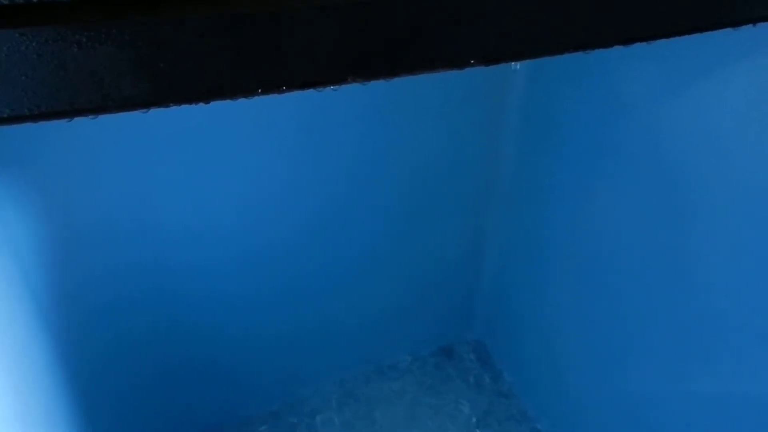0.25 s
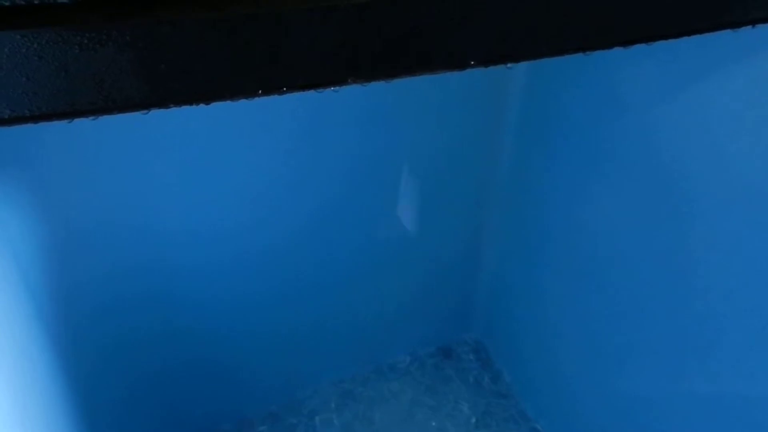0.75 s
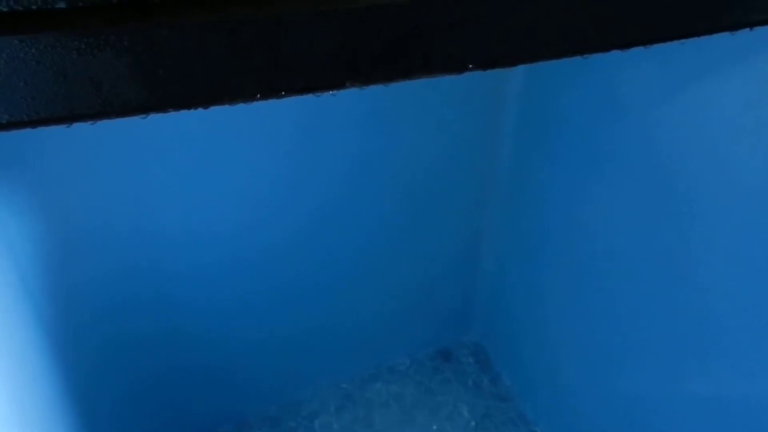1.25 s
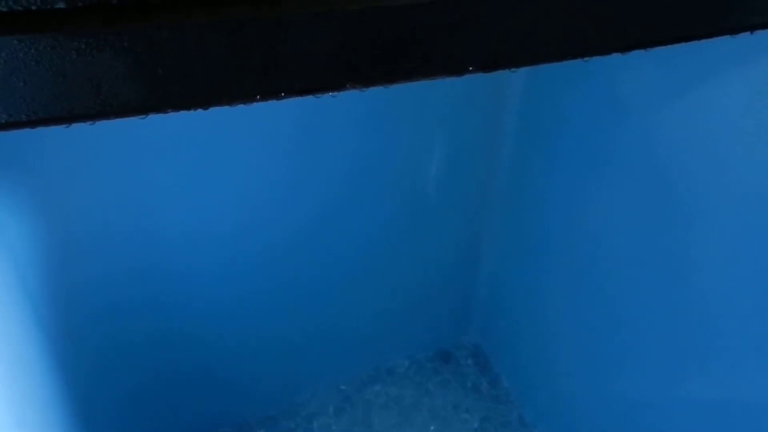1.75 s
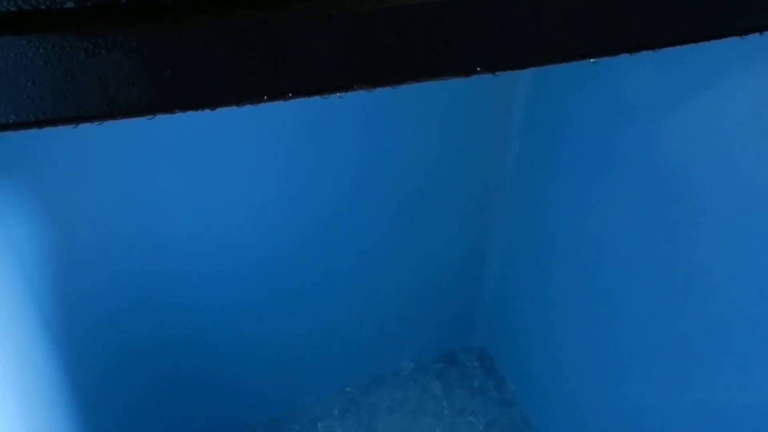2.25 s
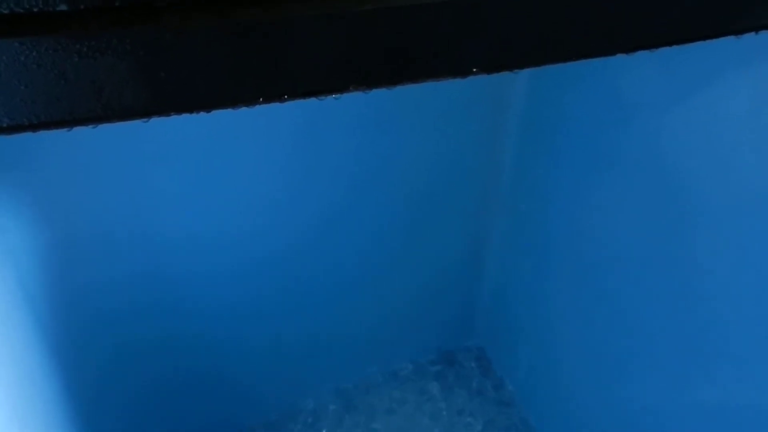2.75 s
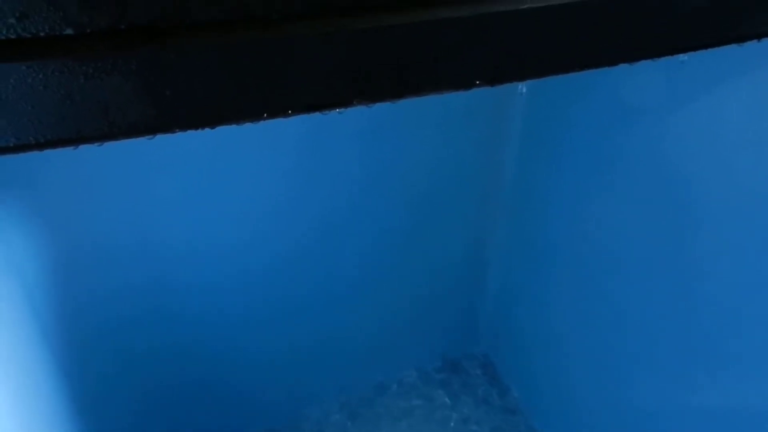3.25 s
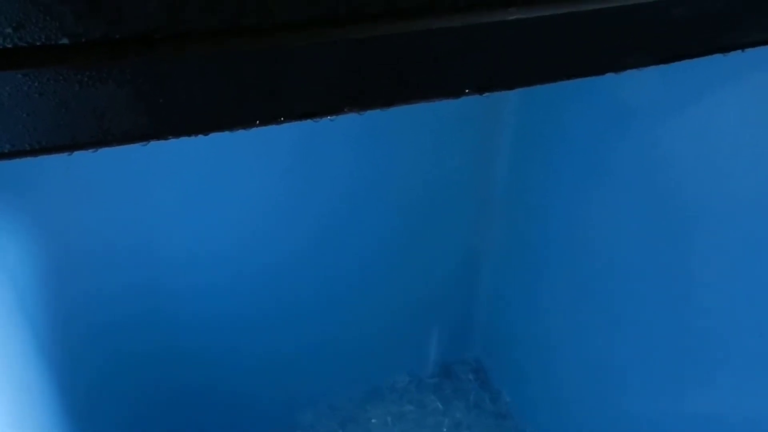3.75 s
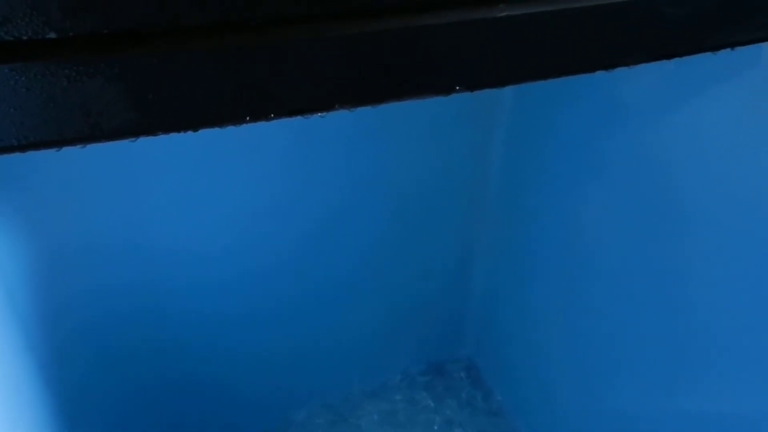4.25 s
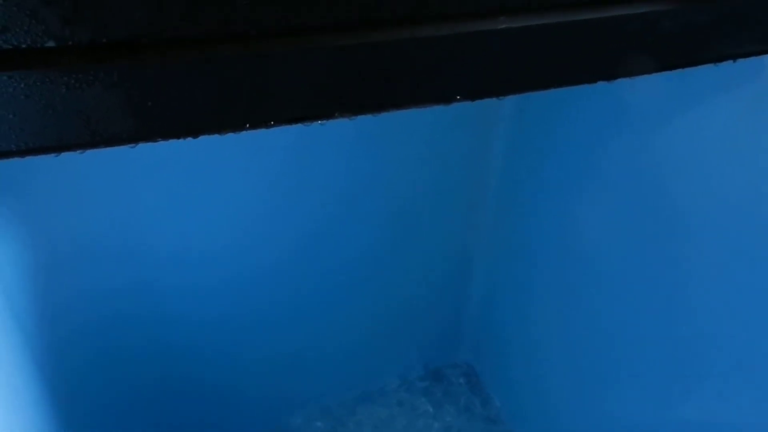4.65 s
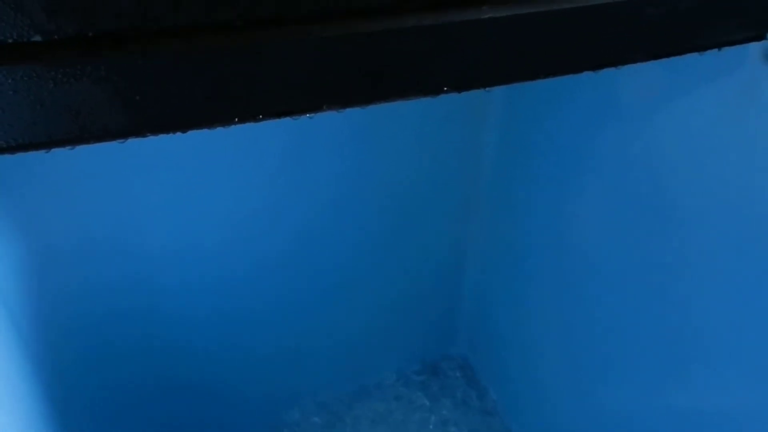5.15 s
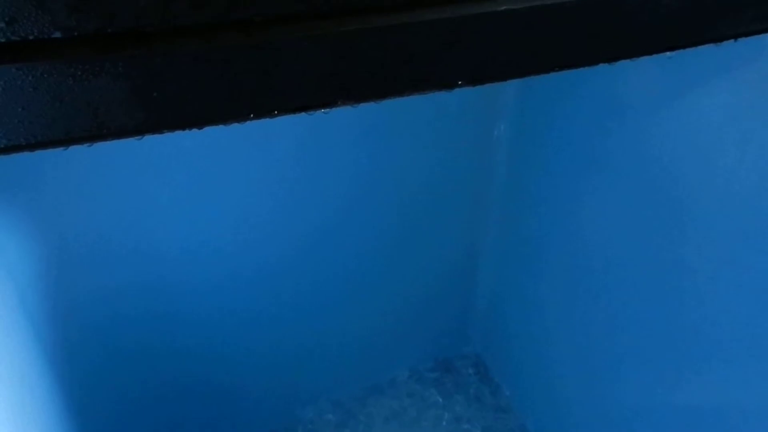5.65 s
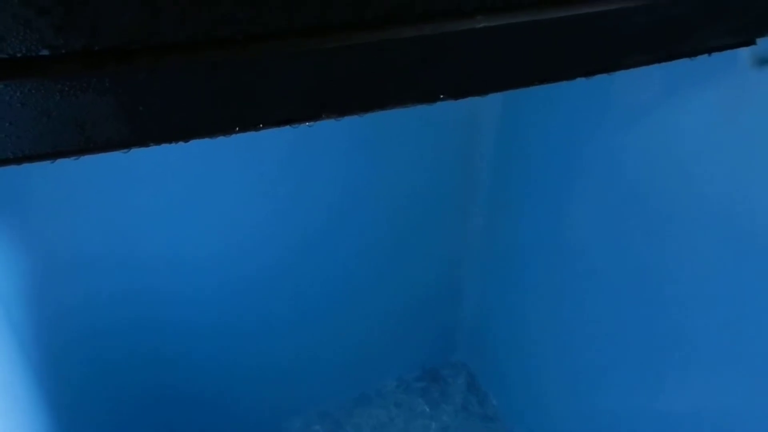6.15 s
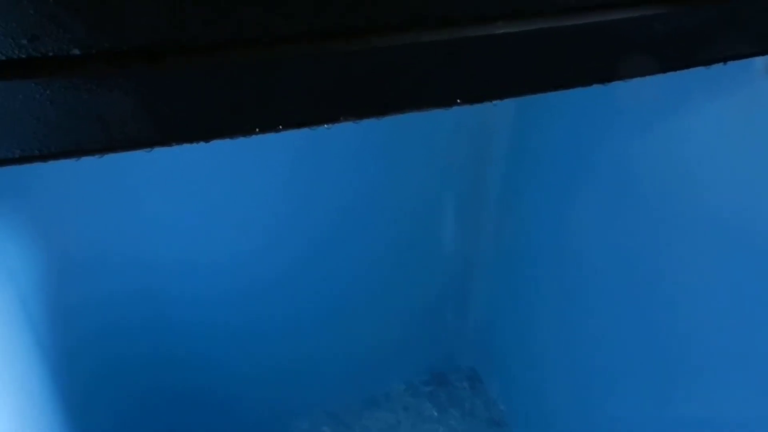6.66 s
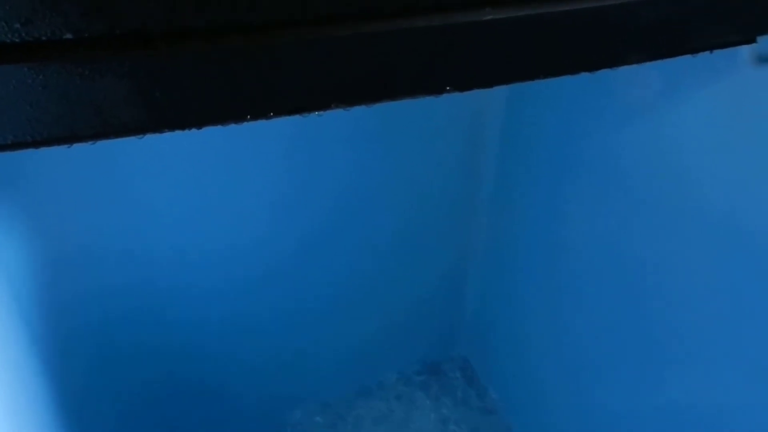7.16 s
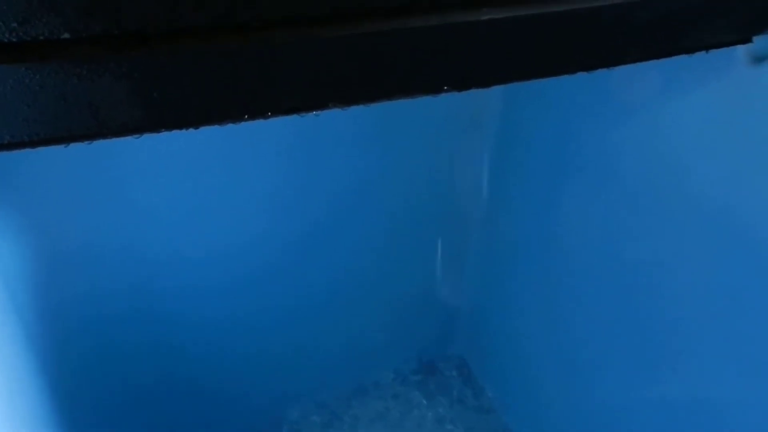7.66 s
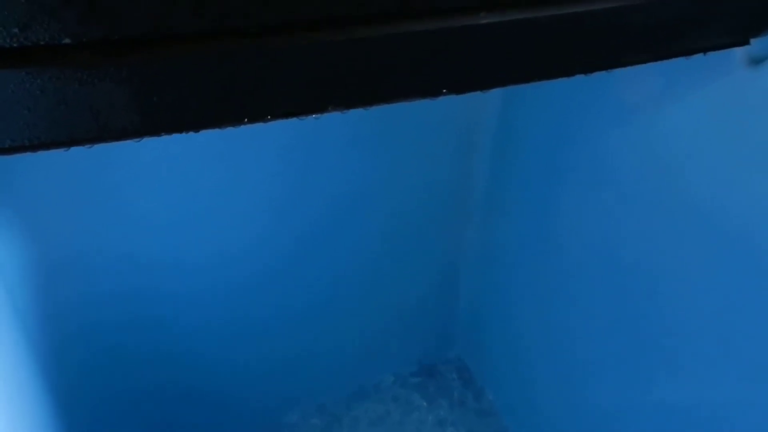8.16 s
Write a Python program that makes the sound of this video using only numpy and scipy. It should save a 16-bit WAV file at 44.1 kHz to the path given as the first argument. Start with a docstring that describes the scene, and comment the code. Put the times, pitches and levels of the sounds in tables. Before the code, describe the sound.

Steady deep compressor and gear drone with a faint whine, and lumpy scraping of ice behind a cabinet. In front, bright, dry, brittle knocks of ice, some hollow, some hissy, scatter slightly left and right with a brief plastic-bin ring and faint hall echo. Loud clacks momentarily push the hum down and it creeps back, most strongly in a lull after the middle.

```python
"""Ice machine, close at the bin

A commercial ice machine stands in a hall, with a stereo microphone close to its plastic ice bin.
Behind, motor tones hum and shaped noise grinds; now and then the scraper bites harder and rasps.
In front, each sound of the ice is a burst of noise with its own note and a brief bin echo; crumbs tick between.
The recorder's gain control ducks at loud clacks and creeps back, so the hum keeps swelling up again."""
import sys
import numpy as np
from scipy import signal
from scipy.fft import rfft, irfft
from scipy.io import wavfile
from scipy.ndimage import uniform_filter1d

SR = 44100
rng = np.random.default_rng(int(sys.argv[2]) if len(sys.argv) > 2 else 0)


def generate_wav(sig):
    """Save sig (samples, or channels by samples) to the path in sys.argv[1] as 16-bit PCM at SR."""
    pcm = np.round(np.clip(np.atleast_2d(sig).T, -1, 1) * 32767).astype(np.int16)
    wavfile.write(sys.argv[1], SR, pcm)


N = 371322
T = np.arange(N) / SR  # s

# Steady tones of compressor, fan and gear motor, before the slow level curve acts: f/Hz, level/dB rms
MOTOR_TONES = [(26.0, -49), (34.9, -41), (56.2, -38), (58.9, -24), (81.7, -26.5), (117.8, -16.5),
               (137.3, -34), (176.6, -29.5), (274.6, -33), (294.4, -27), (330.3, -37.5), (353.3, -28),
               (392.3, -31), (960.0, -35.5), (1000.9, -38.5), (1295.2, -48), (1354.1, -38)]
# Grinding heard through the cabinet, relative spectrum: f/Hz, level/dB per Hz
GRIND_COLOUR = [(20, -18), (45, -7.5), (90, -5.5), (160, 1), (260, 0), (400, -1), (480, -6), (950, -9.5),
                (1400, -13), (1850, -21.5), (2700, -25.5), (6000, -30), (12000, -34.5), (16000, -43)]
# Cabinet resonances that colour the grinding: f/Hz, width/Hz, peak/dB
CABINET_RESONANCES = [(404, 62, 3.5), (523, 45, 4.5), (186, 42, 1.5), (328, 14, 1.5), (777, 71, 4),
                      (1260, 43, -2), (1304, 29, 6.5), (1780, 270, 5.5), (7200, 610, 4), (11100, 710, 10.5)]
# Slow rise and fall of hum and grinding: t/s, level/dB
MACHINE_LEVEL = [(0, 1), (.45, 2.5), (.9, -2.5), (1.5, 0), (2.4, 1.5), (2.9, 3.5), (3.3, -5), (4.3, 6),
                 (4.75, 7), (5, 3), (5.32, 4.5), (5.8, -2), (6.2, 1), (6.7, 2), (7.1, 1.5), (7.8, 1),
                 (8.42, 2.5)]
# The scraper bites into thicker ice and rasps louder: t/s, relative strength/dB
SCRAPER_BITES = [(.21, 12), (.32, 11.5), (.45, 8.5), (1.48, 13), (5.73, -1), (5.98, 7.5), (6.3, 8),
                 (6.43, 3), (6.578, 4), (7.5, 6), (7.74, 8), (7.85, 6)]
# Shower of fine crumbs: t/s, level/dB
CRUMB_LEVEL = [(0, -18.5), (.3, -26.5), (2.3, -29), (3.2, -29.5), (4.3, -27.5), (5.1, -35), (5.9, -44),
               (6.5, -28), (8.42, -24.5)]
# Relative spectrum of breaking ice in the bin: f/Hz, level/dB per Hz
ICE_SPECTRUM = [(150, 2.5), (400, -5.5), (550, 4.5), (680, 3), (920, 2.5), (1350, -2), (1750, -0.5),
                (2600, -3.5), (3800, 0), (5600, 2.5), (8300, -4), (11300, -2.5), (14000, -4.5),
                (16000, -15)]
# Single sounds from the ice, loud and faint: clacks, cracks, a few crunches and faint sizzles:
# t/s, relative level/dB, knock below about 2 kHz/dB, sizzle above about 9 kHz/dB, clatter time/s,
# own note f/Hz
ICE_SOUNDS = [(.049, -9.5, 3, 2.5, 0.0027, 11600), (0.0837, -7, -2, 3.5, 0.0026, 3040),
              (.131, -17.5, 1, 7, 0.0036, 890), (.164, -14, 3, 4, 0.0083, 1110),
              (.402, -29, 6, 12, 0.0018, 12900), (0.544, -6, -3, 3.5, 0.0022, 10500),
              (0.6885, -1.5, -1, 5, 0.00068, 11200), (.825, -5.5, 0, 4, 0.0049, 2400),
              (0.9746, -11.5, 1, 1, 0.00091, 12100), (1.093, -10, 5, 3, 0.0024, 6900),
              (1.241, -14, 7, -1.5, 0.017, 9800), (1.34, -11.5, 3, 5, 0.0084, 6330),
              (1.398, -7, -2.5, 4.5, 0.0025, 2460), (1.585, -14.5, -2, 4, 0.0042, 6900),
              (1.616, -5.5, 5, 5.5, 0.0017, 3720), (1.769, -17.5, -1, 5, 0.00054, 10500),
              (1.839, 0.5, 1, 5.5, .0018, 4600), (1.8826, -2, 7.5, 0, 0.0024, 2870),
              (1.975, -5.5, 1, -0.5, 0.0038, 2810), (2.05, -21, 4, 2.5, .005, 11500),
              (2.1036, -11, -3, 3, 0.007, 5260), (2.122, -7, 5, 10, 0.0014, 11600),
              (2.247, 0.5, -3, 8.5, 0.00017, 5630), (2.397, -1.5, 5.5, 2, 0.0024, 4100),
              (2.486, -14.5, 7, 3.5, 0.0092, 11800), (2.609, -13, 9, 1.5, 0.0066, 3300),
              (2.762, -3, 6.5, 0, 0.0055, 1740), (2.9317, -2.5, 3.5, 1.5, .003, 860),
              (3.02, -8, 2, 4.5, 0.0069, 875), (3.104, -11, 9, 4, 0.0035, 10500),
              (3.138, -9, -20.5, -2, .002, 5860), (3.21, -20, 7, 0, .008, 1950),
              (3.255, -10, -0.5, 4.5, 0.0016, 6540), (3.4201, -11, 5, .5, 0.0011, 8600),
              (3.538, -10.5, 7.5, 7.5, 0.0021, 6550), (3.648, -25.5, 8, -5, 0.0024, 12500),
              (3.818, -11.5, 6, 9.5, 0.0027, 1710), (3.9319, -2.5, 3.5, 0, 0.0053, 1370),
              (4.0255, -15, 11, -1, 0.0052, 1080), (4.1139, -4.5, 7.5, 1, 0.0029, 6000),
              (4.186, 2, 5, 4.5, 0.0032, 5130), (4.264, -13.5, -7, 6.5, 0.0015, 10800),
              (4.359, -2, 0.5, 0.5, .0026, 5500), (4.48, -7, -2.5, 1, .0012, 11100),
              (4.536, -14.5, 0, 0, 0.0022, 5830), (4.627, -21, -6.5, 10, 0.0018, 13400),
              (4.8045, -2, 1.5, 0.5, 0.0022, 1830), (4.908, -17, -11, 2, 0.0081, 10980),
              (4.996, -21.5, -20, 7, 0.0015, 11300), (5.382, -29.5, 26, 4, 0.011, 13500),
              (5.504, -34, 14, 10, 0.01, 13500), (5.7, -23, 8, 3.5, 0.015, 13100),
              (5.91, -37.5, 3, 8.5, 0.0035, 13000), (6.0173, -8, 0, 3.5, 0.0045, 4470),
              (6.111, -10, 2, 1, 0.0073, 10500), (6.172, -13.5, 6, 9.5, 0.00052, 8500),
              (6.3149, -5.5, 1, 1.5, 0.0011, 3080), (6.365, -12, 0, 7.5, 0.012, 3860),
              (6.495, -14, -5, -2, 0.0014, 12200), (6.681, -23, 1, 5.5, 0.0049, 4050),
              (6.7036, -6, 6, 0, .004, 597), (6.766, -9.5, 9, 3, 0.0064, 600),
              (6.818, 3, -0.5, 4, 0.0038, 5250), (6.882, -5, 4, 3, 0.014, 12500),
              (7.1663, -6, -5, 2, 0.0031, 2900), (7.301, -5, 3.5, 1.5, 0.007, 12600),
              (7.554, -24, 13, 11, .005, 950), (7.593, -8.5, 7.5, 2.5, 0.007, 12100),
              (7.674, -16.5, 8, -23, 0.0019, 1940), (7.7088, -19.5, 2, -5, 0.0024, 3830),
              (7.863, -10.5, 7, -9, 0.0034, 780), (7.8945, -3, 5, 4, .003, 3400),
              (8.03, -20.5, 1, 9, .002, 10400), (8.1573, 1, -2.5, 4.5, 0.0014, 3700),
              (8.175, 1.5, 2, -3, 0.0017, 9000), (8.2474, -7.5, 7, 4, 0.0029, 6560),
              (8.291, -6, 2, 1.5, .0036, 2760), (8.3847, -4.5, 10.5, -5, 0.0044, 705)]
# Share of an ice sound's energy that arrives before the bin's echoes: f/Hz, share/0-1
DIRECT_SHARE = [(900, 0.63), (4000, 0.58), (12000, 0.47)]
# Microphone pair, stereo width: f/Hz, side minus mid/dB
MIC_WIDTH = [(60, -16), (130, -23), (250, -20), (500, -18), (1000, -12.5), (2000, -9.5), (4000, -3.5),
             (8000, -2), (14000, 0)]
# Microphone pair, balance: f/Hz, left minus right/dB
MIC_LEAN = [(60, 5), (110, 1.5), (200, 0), (380, 1), (700, 0.5), (1290, 1), (2380, -1), (4400, -2.5),
            (8120, -1.5), (15000, 5)]

BIN_T60, HALL_T60 = 0.19, 1  # s
RUN_UP = 0.04  # s kept ahead of each ice sound for a faint rustle
BITE_S, BITE_HZ = 0.031, (804, 2750)  # half the length of a bite in s, and the band it rasps in
CRACK_S, CRACK_SHARE = 0.0015, 0.18  # decay of the first contact in s, and its share of the blow
CLINK_HZ, CLINK_WIDTH_HZ = (5950, 14560), 102  # range and width of the faint high rings of the ice
EDGE_HZ = 15900  # upper band limit of the recorder


def gain_of(db):
    """Converts dB to an amplitude factor."""
    return 10 ** (np.asarray(db) / 20)


def evened(x):
    """Scales to rms 1."""
    return x / np.sqrt(np.mean(x ** 2) + 1e-20)


def read(points, hz):
    """Reads a spectrum table on a log-frequency axis."""
    f, value = np.transpose(points)
    return np.interp(np.log(hz + 1), np.log(f + 1), value)


def curve(rows):
    """Reads a table of (s, value) at every sample."""
    return np.interp(T, *np.transpose(rows))


def bandpass(x, band_hz):
    """Keeps one band without shifting it in time."""
    sos = signal.butter(2, band_hz, "band", fs=SR, output="sos")
    return signal.sosfiltfilt(sos, x)


def drift(rate_hz):
    """Random movement of rms 1: noise under a Gaussian low-pass."""
    hz = np.fft.rfftfreq(N, 1 / SR)
    return evened(irfft(rfft(rng.standard_normal(N)) * np.exp(-(hz / rate_hz) ** 2), N))


def microphone_pair(pair, colour_db):
    """Colours a mid and a side signal and gives left and right; the side is weak in the bass."""
    size = pair.shape[1]
    hz = np.fft.rfftfreq(size, 1 / SR)
    mid, side = rfft(pair) * gain_of(colour_db(hz))
    width = gain_of(read(MIC_WIDTH, hz))
    lean = read(MIC_LEAN, hz) / 2
    ports = np.array([mid + width * side, mid - width * side]) / np.sqrt(1 + width ** 2)
    return irfft(ports * gain_of([lean, -lean]), size)


def dying(t, t60):
    """Two independent noise tails of reflections, each with unit energy."""
    tail = rng.standard_normal((2, len(t))) * gain_of(-60 * t / t60)
    return tail / np.linalg.norm(tail, axis=1, keepdims=True)


def hall_echo(ice, level_db=-19):
    """Faint long echo of the ice from the hall: convolution with dying noise."""
    return gain_of(level_db) * signal.oaconvolve(ice, dying(T[:SR], HALL_T60), axes=1)[:, :N]


def hum(waver=0.18, wander_hz=0.12):
    """Motor tones: each wavers a little in strength, and the high ones wander more in phase."""
    slip = np.cumsum(drift(1.3)) / SR
    out = np.zeros(N)
    for hz, db in MOTOR_TONES:
        # the frequency wander is wander_hz at 118 Hz and grows with the tone's frequency
        turns = hz * T + wander_hz * slip * hz / 118 + rng.random()
        strength = gain_of(db) * (1 + waver * drift(8.4))
        out += strength * np.sqrt(2) * np.sin(2 * np.pi * turns)
    return out * gain_of([[0.15], [-0.15]])  # a touch to the left


def grind_colour_db(hz):
    """Spectrum of the grinding, with each cabinet resonance as a bell-shaped peak or dip."""
    peaks = sum(db / (1 + (2 * (hz - f) / width) ** 2) for f, width, db in CABINET_RESONANCES)
    return read(GRIND_COLOUR, hz) + peaks


def bite_strength(level_db=-4.5, chatter_db=3.5):
    """Each bite of the scraper swells and fades as a Gaussian while a fast random chatter shakes it."""
    swells = sum(gain_of(db + level_db) * np.exp(-((T - s) / BITE_S) ** 2) for s, db in SCRAPER_BITES)
    return swells * evened(gain_of(chatter_db * drift(110)))


def grinding(level_db=-18.5, lumpy_db=2.0, rasp_db=2.5, rasp_gain_db=0.5, buzz=0.07, shaft_hz=57.2):
    """Ice scraped off the cold wall: lumpy rumble, a rasp that catches and shakes with the motor, bites."""
    noise = microphone_pair(rng.standard_normal((2, N)), grind_colour_db)
    rasp = bandpass(noise, [450, 3000])
    rumble = (noise - rasp) * evened(gain_of(lumpy_db * drift(18)))
    shaking = 1 + buzz * np.cos(2 * np.pi * shaft_hz * T)
    catch = evened(gain_of(rasp_db * drift(23)) * shaking)
    bites = bandpass(noise, BITE_HZ) * bite_strength()
    total = rumble + gain_of(rasp_gain_db) * rasp * catch + bites
    return gain_of(level_db) * total / np.std(noise)


def crumbs(per_s=170, spread_db=4.0, tick_t60=0.0049):
    """Tiny chips tick against the pile at random, a few much louder than the rest, and the bin answers."""
    sizes = gain_of(spread_db * np.minimum(rng.exponential(1, N), 4))
    landing = rng.random(N) < per_s / SR
    impulses = sizes * landing * rng.standard_normal((2, N))
    t = T[:SR // 4]
    response = dying(t, tick_t60) + 2 * dying(t, BIN_T60)
    ticks = signal.oaconvolve(impulses, response, axes=1)[:, :N]
    coloured = microphone_pair(ticks, lambda hz: read(ICE_SPECTRUM, hz))
    return gain_of(curve(CRUMB_LEVEL)) * evened(coloured)


def contact_energy(t, clatter):
    """Energy of an ice sound over time: one sharp crack and a quick swarm of contacts; sums to 1."""
    u = np.maximum(t, 0) / max(clatter, 1 / 4000)
    swarm = u * np.exp(-u)
    crack = (t > 0) * np.exp(-abs(t) / CRACK_S)
    return (1 - CRACK_SHARE) * swarm / swarm.sum() + CRACK_SHARE * crack / crack.sum()


def clink_response(hz, level_db=4.0, count=6):
    """Adds a few narrow resonances at random high frequencies to a flat response."""
    centres = rng.uniform(*CLINK_HZ, (count, 1))
    rings = 1 / (1 + 2j * (hz - centres) / CLINK_WIDTH_HZ)
    return 1 + gain_of(level_db) * np.sum(rings, axis=0)


def ice_colour_db(hz, note_hz, note_db=7.5, note_width=0.13, own_db=2.0):
    """Ice spectrum with random unevenness and a resonant note, scaled to rms 1."""
    shape_db = np.interp(hz, np.linspace(0, SR / 2, 48), rng.standard_normal(48))
    note = 1 / (1 + (2 * (hz / note_hz - 1) / note_width) ** 2)
    return 20 * np.log10(evened(gain_of(read(ICE_SPECTRUM, hz) + own_db * shape_db + note_db * note)))


def ice_sound(knock_db, sizzle_db, clatter, note_hz, grain_db=3.0, lead_db=-12.0, lead_s=0.0057, size=16384):
    """One ice sound: faint rustle, crack and swarm as noise bursts, then bin echoes, coloured by its note."""
    t = np.arange(size) / SR - RUN_UP
    energy = contact_energy(t, clatter)
    rustle = np.exp(-abs(t) / lead_s)
    rustle *= gain_of(lead_db) ** 2 / rustle.sum()
    # the blow is grainy: its strength jumps every 32 samples
    contacts = np.repeat(gain_of(grain_db * np.clip(rng.standard_normal(size // 32), -2, 2)), 32)
    blow = evened(rng.standard_normal((2, size)) * contacts * np.sqrt(energy + rustle))
    # the bin's energy falls 60 dB in BIN_T60
    ringing = abs(signal.fftconvolve(energy, 10 ** (-6 * T[:size] / BIN_T60))[:size])
    echo = evened(rng.standard_normal((2, size)) * np.sqrt(ringing))

    hz = np.fft.rfftfreq(size, 1 / SR)
    share = np.clip(read(DIRECT_SHARE, hz), 0, 1)
    direct = np.sqrt(share) * rfft(blow) * clink_response(hz)
    sound = irfft(direct + np.sqrt(1 - share) * rfft(echo), size)
    tilt_db = read([(1900, knock_db), (2700, 0), (7500, 0.0099), (9500, sizzle_db)], hz)
    colour_db = ice_colour_db(hz, note_hz) + tilt_db
    # levels count as the rms of the whole energy gathered in a hundredth of a second
    return microphone_pair(sound, lambda hz: colour_db) * np.sqrt(SR / 100 / size)


def ice_in_bin(level_db=-0.37, scatter_db=1.2):
    """All the single ice sounds, each with its own slight left-right balance from its place in the bin."""
    out = np.zeros((2, N))
    for s, db, knock_db, sizzle_db, clatter, note_hz in ICE_SOUNDS:
        pan_db = scatter_db * rng.standard_normal()
        sides = gain_of([[db + pan_db / 2], [db - pan_db / 2]])
        sound = ice_sound(knock_db, sizzle_db, clatter, note_hz) * sides
        start = max(round((s - RUN_UP) * SR), 0)
        part = out[:, start:start + sound.shape[1]]
        part += sound[:, :part.shape[1]]
    return gain_of(level_db) * out


def scene():
    """The machine at its slowly changing level, the ice close by, and the ice's faint echo from the hall."""
    machine = (hum() + grinding()) * gain_of(curve(MACHINE_LEVEL))
    ice = crumbs() + ice_in_bin()
    return machine + ice + hall_echo(ice)


def record(dry, limit_db=-15.5, recover_db_per_s=15.0, start_duck_db=12.5, sense_s=0.0034):
    """Gain control, deaf to the bass, ducks quickly on loud clacks and recovers slowly; then a band limit."""
    heard = signal.sosfilt(signal.butter(2, 800, "high", fs=SR, output="sos"), dry)
    power = uniform_filter1d((heard ** 2).mean(0), size=round(sense_s * SR))
    power_db = 10 * np.log10(abs(power) + 1e-12)
    # hold the largest excess so far while it falls at a steady rate; the start is already ducked
    fall = T * recover_db_per_s
    peak_db = np.maximum.accumulate(power_db - limit_db + fall)
    held_db = np.maximum(peak_db, start_duck_db) - fall
    ducked = dry / gain_of(uniform_filter1d(np.maximum(held_db, 0), size=66))
    # spikes too quick for the gain control are rounded off
    rounded = ducked / (1 + (ducked / 0.8) ** 8) ** (1 / 8)
    band_limit = signal.firwin(401, EDGE_HZ, window=("kaiser", 9), fs=SR)
    return signal.oaconvolve(rounded, band_limit[None], "same")


dry = scene()
out = record(dry)
generate_wav(out)
```